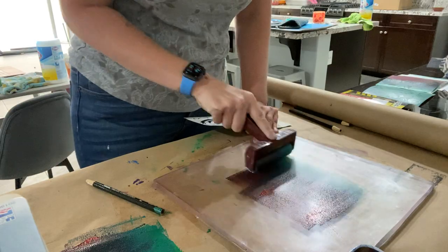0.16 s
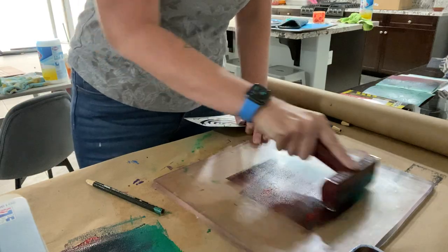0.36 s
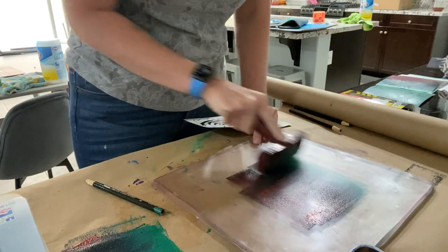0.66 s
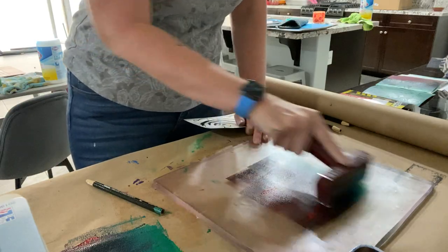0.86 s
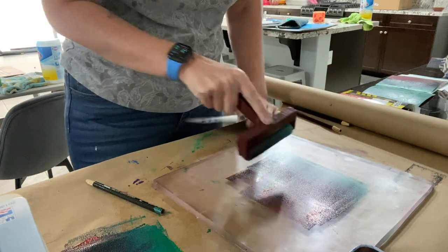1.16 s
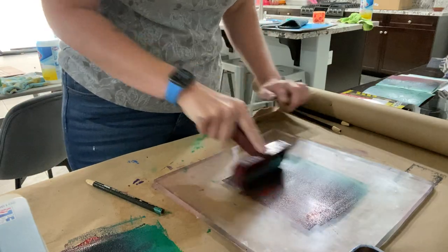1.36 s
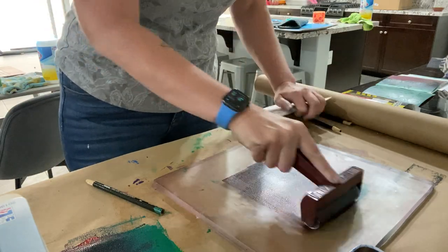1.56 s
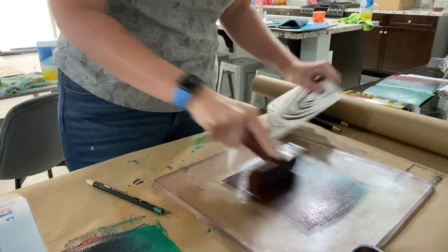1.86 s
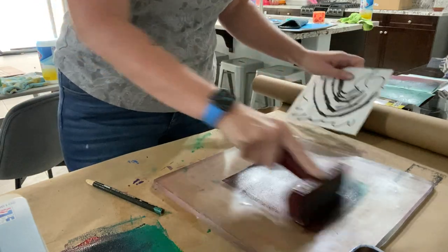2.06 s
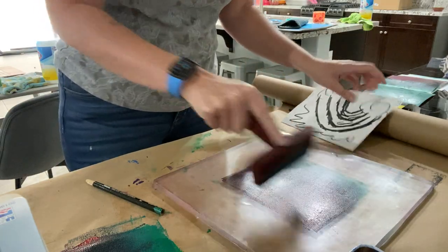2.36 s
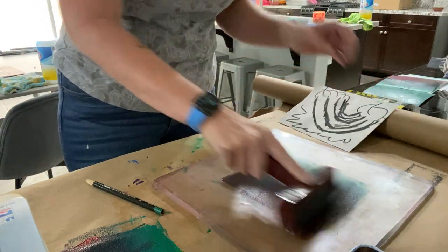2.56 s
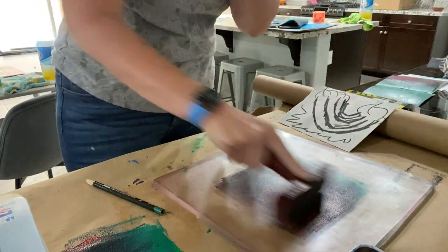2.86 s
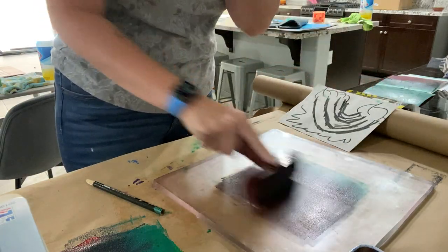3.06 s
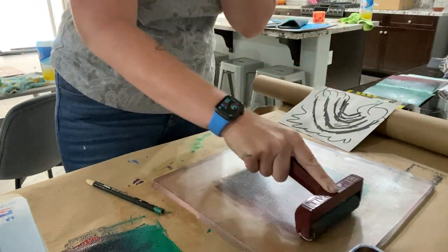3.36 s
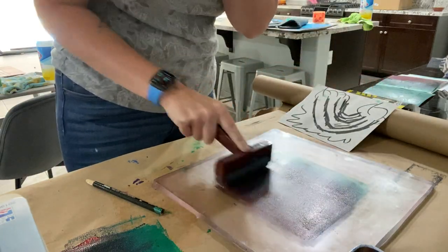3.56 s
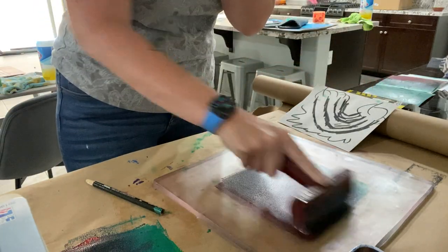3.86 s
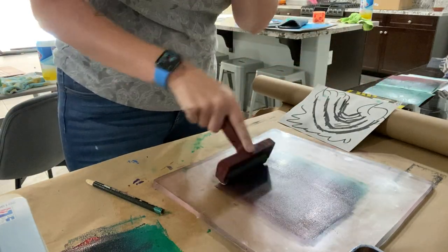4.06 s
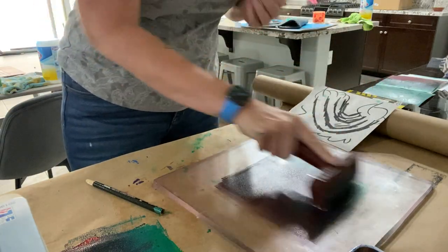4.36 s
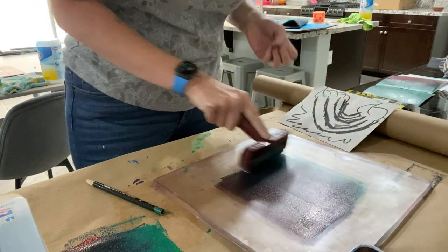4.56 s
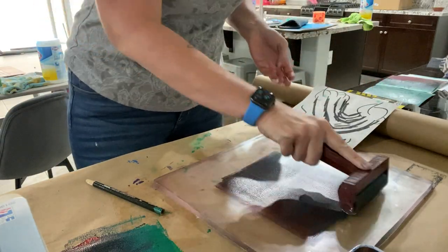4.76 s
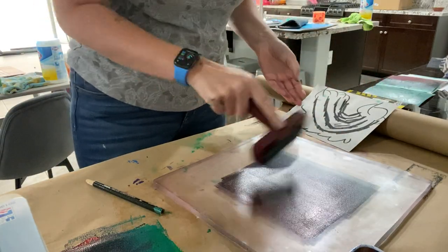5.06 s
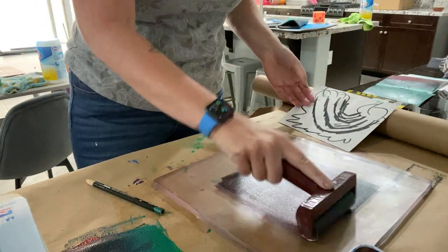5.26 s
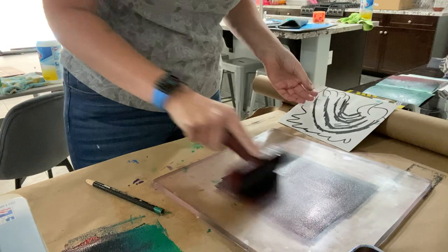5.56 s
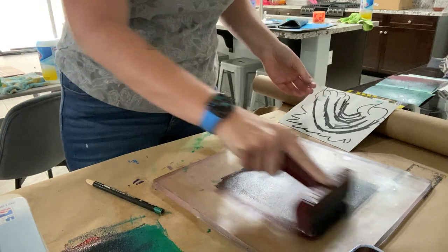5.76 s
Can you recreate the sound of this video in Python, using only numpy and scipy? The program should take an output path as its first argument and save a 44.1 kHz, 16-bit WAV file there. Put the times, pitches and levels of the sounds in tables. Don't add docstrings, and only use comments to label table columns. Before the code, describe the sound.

Short hissing strokes alternate louder and softer as a roller tears sticky ink, its weight bumping and rumbling through the tabletop. Between groups of strokes the loose axle ticks and clatters, then the roller drops with a deep thump and a click. A sheet of card slides past early on. Quiet fridge hum and mild room echo sit behind; a nearby phone on the table picks up strong low vibration.

```python
import sys
import numpy as np
from scipy import signal
from scipy.fft import rfft, irfft, next_fast_len
from scipy.io import wavfile
from scipy.ndimage import uniform_filter1d, map_coordinates

SR = 44100
rng = np.random.default_rng(int(sys.argv[2]) if len(sys.argv) > 2 else 0)


def pcm_store(signal):
    levels = np.round(np.clip(np.atleast_2d(signal), -1, 1) * 32767)
    wavfile.write(sys.argv[1], SR, levels.astype(np.int16).T)


def voltage_ratio(decibels):
    exponent = np.asarray(decibels, float) / 20
    return 10 ** exponent


N = 261072

# start in seconds, end in seconds, tearing ink in dB, weight on the table in dB.
STROKES = [(-0.1, 0.101, -55, -48.5), (0.075, 0.283, -40, -47.5), (0.285, 0.486, -44.5, -45),
           (0.496, 0.706, -39, -44.5), (0.717, 0.911, -43.5, -43.5), (0.921, 1.191, -40, -47),
           (1.394, 1.671, -48.5, -47), (1.659, 1.877, -39.5, -48.5), (1.883, 2.116, -45, -45.5),
           (2.101, 2.386, -39.5, -46), (2.623, 2.818, -38.5, -46), (2.832, 3.036, -44, -48),
           (3.046, 3.252, -37.5, -48.5), (3.259, 3.461, -44.5, -51), (3.474, 3.69, -37.5, -51),
           (3.701, 3.91, -43.5, -47), (3.913, 4.167, -39, -52.5), (4.423, 4.64, -39, -46.5),
           (4.649, 4.849, -43, -43.5), (4.85, 5.13, -40.5, -49), (5.38, 5.6, -39, -54),
           (5.61, 5.817, -44, -49.5), (5.823, 6.064, -37.5, -52.5)]
# start in seconds, peak in dB, table pitch in Hz,
# swell in seconds, after-ring in dB.
LANDINGS = [
    (1.398, -11.5, 91.9, 0.015, -16.5),
    (2.6001, -1.5, 95.1, 0.014, -15.5),
    (4.412, -1, 97.2, 0.013, -20.5),
    (5.348, -7.5, 83.4, .022, -17.5),
]
# frequency in Hz, level in dB per Hz.
PLATE_TONE = [(300, -6), (480, 3), (800, 1.5), (1100, 3), (1500, -4), (2000, -18)]


def unit(x):
    return x / np.sqrt(np.mean(x ** 2) + 1e-20)


def along(points, hz):
    f, v = np.transpose(points)
    return np.interp(np.log(hz + 1), np.log(f + 1), v)


def wobble(rate):
    return map_coordinates(rng.standard_normal(int(N * rate / SR) + 4), [np.arange(N) * rate / SR])


def filtered(x, response):
    m = next_fast_len(N + SR // 2)
    return irfft(rfft(x, m) * response(np.fft.rfftfreq(m, 1 / SR)), m)[..., :N]


def crackle(spectrum, per_s, spread_db, patchy_db):
    # frequency in Hz, likeness from 0 to 1.
    likeness = [(60, 1), (140, 0.84), (330, 0.68), (600, 0.029), (8000, 0.047)]
    snaps = (rng.random((2, N)) < per_s / SR) * rng.standard_normal((2, N))
    snaps = snaps * voltage_ratio(spread_db * rng.standard_normal((2, N)))
    z = signal.stft(snaps, nperseg=256)[2]
    patches = uniform_filter1d(rng.standard_normal(z.shape[1:]), size=4, axis=0)
    patches = uniform_filter1d(patches, size=12, axis=1)
    pair = signal.istft(z * voltage_ratio(patchy_db * unit(patches)), nperseg=256)[1][:, :N]

    def middle_and_side(hz):
        angle = np.arccos(np.clip(along(likeness, hz), -1, 1)) / 2
        return voltage_ratio(along(spectrum, hz)) * [np.cos(angle), np.sin(angle)]

    mid, side = filtered(pair, middle_and_side)
    return unit(np.array([mid + side, mid - side]))


def strokes(db, sharp, flat):
    t, level, place = np.arange(N) / SR, np.zeros(N), np.zeros(N)
    for (start, end, ink_db, _), top_db in zip(STROKES, np.broadcast_to(db, len(STROKES))):
        u = np.clip((t - start) / (end - start), 0, 1)
        speed = abs(np.sin(np.pi * u))
        level += voltage_ratio(top_db) * (np.tanh(flat * speed) / np.tanh(flat)) ** sharp
        pulling = ink_db > -42
        place += (u if pulling else 1 - u) * (u > 0) * (u < 1)
    return level, np.clip(place, 0, 1)


def rolling():
    # frequency in Hz, level in dB per Hz.
    ink_early = [(3000, -60), (4500, -12), (6000, -7), (7600, 0), (9300, -4), (12200, .5), (13600, -5),
                 (14800, -3.5), (15700, -2.5)]
    ink_late = [(3000, -60), (4500, -12), (6000, -5), (7200, 0), (9000, -4), (10900, .5), (12600, -5.5),
                (14500, -2), (15700, -2)]
    # frequency in Hz, level in dB per Hz.
    rasp_tone = [(1200, -72), (1700, -9.5), (2300, 0.5), (2800, -4), (3400, -2.5), (4200, -5),
                 (5500, -11.5), (7500, -17)]
    # frequency in Hz, level in dB per Hz.
    rumble_tone = [(100, -5), (150, 3), (230, -11), (310, -6.5), (400, -19), (600, -56)]
    start, _, ink_db, weight_db = np.transpose(STROKES)

    pull, gone = strokes(ink_db, sharp=1.4, flat=1.1)
    early = np.cos(gone * np.pi / 2) * crackle(ink_early, per_s=25000, spread_db=2.0, patchy_db=3.5)
    late = np.sin(gone * np.pi / 2) * crackle(ink_late, per_s=25000, spread_db=0.0, patchy_db=1.5)
    ink = pull * voltage_ratio(0.6 * wobble(40)) * (early + late)

    rasp_db = -53 + 6 * (start < 0)
    rasp = strokes(rasp_db, sharp=1.0, flat=0.28)[0] * voltage_ratio(1.4 * wobble(50))
    rasp = rasp * crackle(rasp_tone, per_s=8000, spread_db=0.0, patchy_db=4.0)

    plate_db = -54.5 - 2.5 * (start < 1.3)
    plate = strokes(plate_db, sharp=1.0, flat=0.36)[0] * voltage_ratio(0.59 * wobble(25.08))
    plate = plate * crackle(PLATE_TONE, per_s=2600, spread_db=0, patchy_db=3.5)

    rumble = strokes(weight_db, sharp=1.0, flat=2.35)[0] * voltage_ratio(4.9 * wobble(30))
    rumble = rumble * crackle(rumble_tone, per_s=900, spread_db=1.5, patchy_db=3.5)
    return ink + rasp + plate + rumble


def room(x):
    # frequency in Hz, time to fall by 60 dB in seconds.
    ring_time = [(300, .5), (1500, .65), (3500, .65), (5500, .5), (7500, .36), (10000, .2), (14000, .14)]
    hz, t, z = signal.stft(rng.standard_normal((2, SR // 2)), SR, nperseg=256)
    build_up = 1 - np.exp(-t / 0.012)
    fade = voltage_ratio(-60 * t / along(ring_time, hz)[:, None])
    tail = signal.istft(z * build_up * fade, SR, nperseg=256)[1]
    return signal.fftconvolve(x[None], tail / np.linalg.norm(tail[0]), axes=1)


def background():
    # frequency in Hz, rms level in dB.
    hum_tones = [(120, -48), (240, -61.5)]
    # frequency in Hz, level in dB per Hz.
    air_tone = [(25, -37), (60, 3), (120, -8.5), (240, -12.5), (500, -22.5), (1000, -35), (1700, -40),
                (3300, -53), (5600, -44), (7500, -48), (9000, -43), (16000, -71)]
    t = np.arange(N) / SR
    hum = sum(np.sqrt(2) * voltage_ratio(db + 3.4 * wobble(28)) * np.sin(2 * np.pi * hz * t) for hz, db in hum_tones)
    return hum + voltage_ratio(-48) * crackle(air_tone, per_s=40000, spread_db=3.0, patchy_db=0.8)


def jolts():
    # time in seconds (the jolt starts 14 ms earlier), peak in dB,
    # pitch in Hz.
    big = [(0.204, -34, 115), (0.379, -35.5, 132), (0.525, -31, 94), (0.556, -34.5, 90), (0.628, -30.5, 94),
           (0.962, -29.5, 94), (1.065, -30.5, 118.4), (1.792, -30, 97), (2.124, -30, 98),
           (2.247, -32, 86.5), (2.921, -33, 128), (2.998, -33, 107), (3.102, -29, 91), (3.15, -35, 119),
           (3.18, -30, 105.5), (3.352, -31, 123), (3.423, -30, 105), (3.533, -31.5, 95.6),
           (3.612, -31, 110), (3.792, -32, 124), (3.869, -34, 105), (3.955, -30, 103), (4.067, -28.5, 110),
           (4.194, -31, 88), (4.567, -36, 112), (4.806, -31.5, 124), (4.937, -30, 112), (5.025, -33, 97),
           (5.71, -31, 117), (5.871, -27, 92)]
    # delay in swells, level in dB, pitch as a multiple of the table's.
    rebounds = [(4.2, -21.5, 1.1), (7.5, -24.5, 1.2)]
    small = []
    for start, end, *_ in STROKES[1:-1]:
        for _ in range(2):
            s = start + (end - start) * (0.1498 + 0.7 * rng.random())
            db = -35.5 + 1 * rng.standard_normal()
            hz = 105 + 13.6 * rng.standard_normal()
            small.append((s, db, hz))
    again = [(s + delay * swell, db + less_db, hz * up)
             for s, db, hz, swell, _ in LANDINGS for delay, less_db, up in rebounds]
    return big + small + again


def table():
    # frequency in Hz, width in Hz, level in dB.
    sways = [(88, 40.5, 1.5), (112, 38.6, -1), (146, 26, -7)]
    # frequency in Hz, level in dB, time to fall by 60 dB in seconds.
    slab = [(276, -30, 0.061), (468, -32.5, 0.08), (707, -42, 0.087)]
    weight_db = np.transpose(STROKES)[3]
    grit = strokes(weight_db, sharp=1.0, flat=0.5)[0] * rng.standard_normal(N)

    def table_top(f):
        return sum((-1) ** k * voltage_ratio(db) * 1j * f * width / (hz * hz - f * f + 1j * f * width)
                   for k, (hz, width, db) in enumerate(sways))

    out = np.pad(voltage_ratio(23.5) * filtered(grit, table_top), (0, SR))
    t = np.arange(SR // 2) / SR
    for s, db, hz in jolts():
        push = (t / 0.015) ** 1.03 * np.exp(1.5 - 1.55 * t / 0.014)
        jolt = push * np.sin(2 * np.pi * (hz * t + rng.random()))
        out[round((s - 0.014) * SR):][:len(t)] += voltage_ratio(db + 1.5) * jolt

    for s, db, hz, swell, ring_db in LANDINGS:
        cycles = hz * (t + 0.29 * 0.015 * (1 - np.exp(-t / 0.0039)))
        blow = (t / swell) ** 0.96 * np.exp(0.45 - 0.67 * (t / swell) ** 2) * np.sin(2 * np.pi * cycles)
        ring = voltage_ratio(ring_db - 60 * t / 0.5) * (1 - np.exp(-(t / 0.029) ** 2))
        ring = ring * np.sin(2 * np.pi * 1.08 * hz * t)
        slap = voltage_ratio(-26.0 - 60 * t / 0.14) * np.sin(2 * np.pi * 1.955 * hz * t)
        slap += sum(voltage_ratio(level - 60 * t / t60) * np.sin(2 * np.pi * f * t) for f, level, t60 in slab)
        out[round(s * SR):][:len(t)] += voltage_ratio(db) * (blow + ring + slap)

    apart = filtered(out[:N], lambda f: 0.12j * np.sqrt(f / 100))
    return out[:N] * voltage_ratio([[-0.2], [0.2]]) + apart * [[1], [-1]]


def contacts():
    # start in seconds, peak in dB, ring in Hz, top end in dB, low end in dB.
    axle = [(1.146, -29.5, 3453, -27, -18), (1.1711, -39.5, 3560, -23, 3.5), (1.258, -33.5, 3214, -15, -5),
            (1.327, -42, 2740, -28, -22), (2.343, -27.5, 3270, -16, -4), (2.4602, -28, 3170, -4, -29),
            (2.4703, -36, 3230, -22, -5), (2.51, -47, 2610, -14, -1), (2.5247, -41, 3270, -18, 1),
            (3.112, -43, 3320, -2, 2), (3.934, -42, 3310, -4, -16), (4.158, -37, 3400, -34, 2),
            (4.1745, -38, 2880, 3, 2.5), (4.3264, -25, 4110, -16.5, -27), (4.3333, -37.5, 2480, -25, 2),
            (5.0922, -26, 3340, -11.5, -8), (5.1224, -41.5, 3600, -3, 7), (5.298, -45.5, 3060, -11, -3)]
    # start in seconds, peak in dB, lowest mode in dB,
    # second mode in dB, room answer in dB.
    slams = [
        (1.394, -15, -4.5, -3.5, -8),
        (2.595, -16, -5, -2.5, -12),
        (4.407, -12.5, -21, -19, -8),
        (5.3432, -10.5, -7.5, -5, -12),
    ]
    # frequency in Hz, level in dB, time to fall by 60 dB in seconds.
    frame_modes = [(2450, -9, .01), (2850, -9, .009), (3400, -5, .013), (4200, -6, .01), (4750, -16, .008)]
    rows = []
    for s, db, hz, top_db, low_db in axle:
        frame = [(f, level + 6 - 17 * abs(np.log2(f / hz)), t60) for f, level, t60 in frame_modes]
        frame.append((hz, 1, 0.009))
        rows.append((s, db, frame, top_db, low_db, 0.003, -9))
    for s, db, first_db, second_db, echo_db in slams:
        levels = [first_db, second_db, 1.5, -5.5, -14.5]
        frame = [(f, level, t60) for (f, _, t60), level in zip(frame_modes, levels)]
        frame[1] = (3073, *frame[1][1:])
        rows.append((s, db, frame, -8, -7, 0.0057, echo_db))
    return rows


def ringing(modes, t, rise):
    luck = rng.standard_normal((len(modes), 3, 2, 1))
    swell = np.clip(t / rise, 0, 1) ** 1.8
    after = np.clip(t - rise, 0, None) / 1.1
    total = 0
    for (hz, db, t60), (loudness, phase, detune) in zip(modes, luck):
        level = swell * voltage_ratio(db + 1.2 * loudness - 60 * after / t60)
        total = total + level * np.sin(2 * np.pi * hz * (1 + 0.02 * detune[0]) * t + 1.1 * phase)
    return total


def clacks():
    # frequency in Hz, level in dB, time to fall by 60 dB in seconds.
    dull = [(600, -20, .012), (1000, -15, .01), (1470, -6, .014), (2050, 0, .01)]
    bright = [(6100, -8, .007), (7350, -4, .01), (9500, -12, .005), (11600, -13, .005), (13800, -26, .004)]
    out, t = np.zeros((2, N + SR)), np.arange(SR // 16) / SR
    for s, db, frame, top_db, low_db, rise, echo_db in contacts():
        crack = np.clip(t / rise, 0, 1) ** 2 * voltage_ratio(-60 * np.clip(t - rise, 0, None) / 0.018)
        crack = crack * uniform_filter1d(rng.standard_normal((2, len(t))), size=3)
        bar = ringing(frame, t, rise) + voltage_ratio(low_db - 3.0) * ringing(dull, t, rise)
        bar += voltage_ratio(top_db - 2.5) * (ringing(bright, t, rise) + 3.5 * crack)
        bar *= voltage_ratio(2.5 * unit(uniform_filter1d(rng.standard_normal(len(t)), size=30)))

        rebounds = np.zeros(SR // 40)
        when = rng.random(4)
        rebounds[(SR * (0.003 + 0.012 * when)).astype(int)] = 0.3 * np.exp(-2.2 * when)
        rebounds[0] = 1
        hit = signal.fftconvolve(bar, rebounds[None], axes=1)
        gain = voltage_ratio(db - 8.5) / np.sqrt(np.sum(hit ** 2) / (SR * 0.022))
        peak_only = np.exp(-abs(t - rise) / 0.0006)
        echo = voltage_ratio(echo_db + 3.5) * room(bar[0] * peak_only)
        at = round((s + 0.0016 - rise) * SR)
        out[:, at:at + hit.shape[1]] += gain * hit
        out[:, at:at + echo.shape[1]] += gain * echo
    return out[:, :N]


def card():
    # time in seconds, body in dB, scratch in dB.
    slides = [
        [(1.44, -63, -79), (1.584, -47, -51), (1.628, -73, -72), (1.68, -63, -47)],
        [(2.15, -58, -59), (2.268, -50, -47.5), (2.408, -51.5, -56.5), (2.62, -50.5, -67)],
    ]
    # frequency in Hz, level in dB per Hz.
    paper_tone = [(3000, -13), (4500, -3), (7400, -1), (9000, -12), (15000, -33)]
    t = np.arange(N) / SR
    low, high = np.zeros((2, N))
    for rows in slides:
        s, body_db, scratch_db = np.transpose(rows)
        inside = np.interp(t, [s[0], s[0] + 0.031, s[-1] - 0.03, s[-1]], [0, 1, 1, 0])
        low += inside * voltage_ratio(np.interp(t, s, body_db))
        high += inside * voltage_ratio(np.interp(t, s, scratch_db))
    body = low * crackle(PLATE_TONE, per_s=3000, spread_db=3, patchy_db=2.5)
    return body + high * crackle(paper_tone, per_s=5000, spread_db=3, patchy_db=2.5)


def scene():
    roll = rolling()
    echo = voltage_ratio(-12.5) * room(roll[0])[:, :N]
    return roll + echo + background() + table() + clacks() + card()


def top_cut(x):
    return signal.sosfilt(signal.butter(12, 15990, fs=SR, output="sos"), x)


def record(dry):
    # frequency in Hz, whole difference in dB, half of it given to each side.
    balance = [(100, -.4), (300, -3.5), (700, -1), (1200, 2.5), (2700, .5), (4200, 0), (7000, 4), (8500, 0)]

    def microphones(hz):
        sides = voltage_ratio(np.multiply.outer([0.5, -0.5], along(balance, hz)))
        return sides * hz / (hz + 25) * (hz < 15740)

    def shared(hz):
        return np.clip((hz - 7100) / 1300, 0, 1) * 0.99

    def late(hz):
        return np.exp(-2j * np.pi * (hz - 11950) / 5430)

    left, right = filtered(dry, microphones)
    own = filtered(right, lambda hz: np.sqrt(1 - shared(hz) ** 2))
    borrowed = filtered(left, lambda hz: shared(hz) * late(hz))
    return top_cut(np.array([left, own + borrowed]))


dry = scene()
out = record(dry)
pcm_store(out)
```